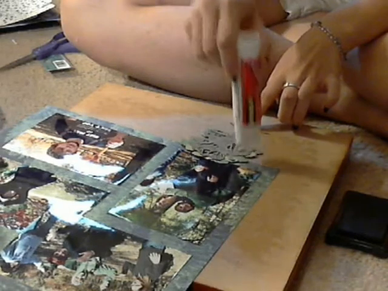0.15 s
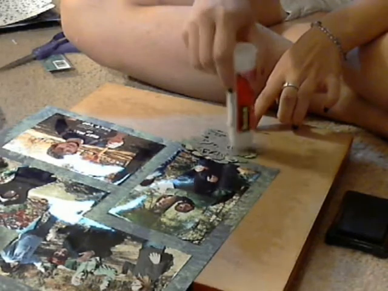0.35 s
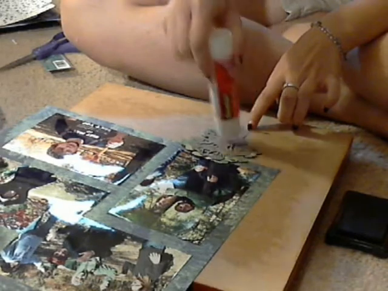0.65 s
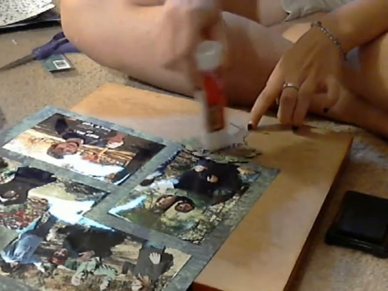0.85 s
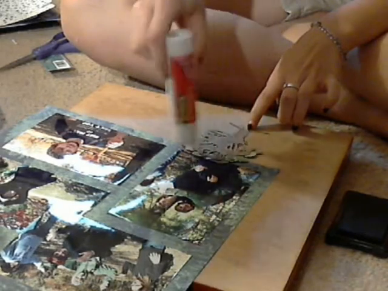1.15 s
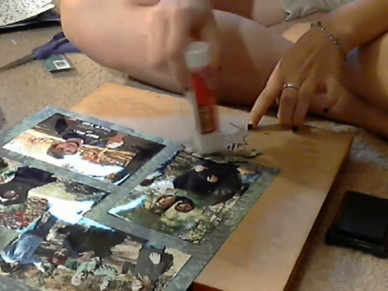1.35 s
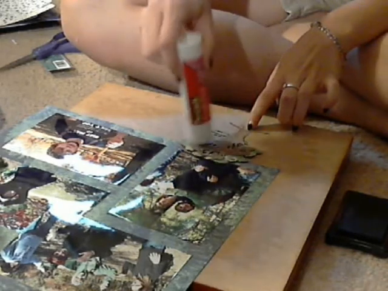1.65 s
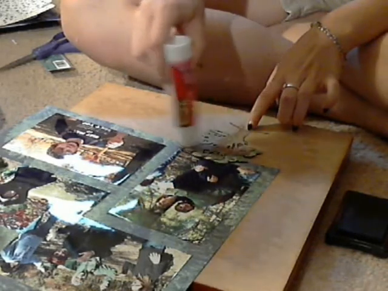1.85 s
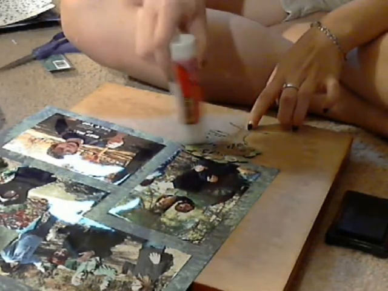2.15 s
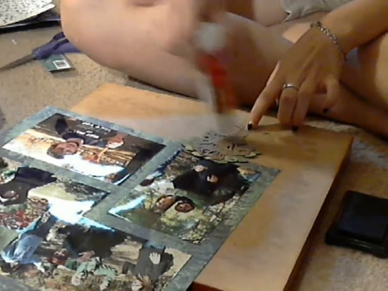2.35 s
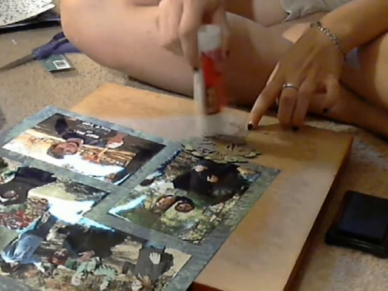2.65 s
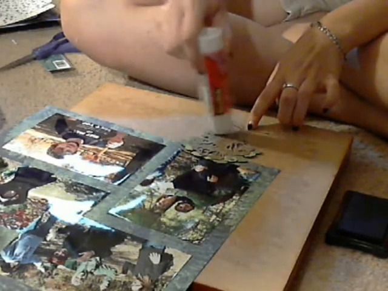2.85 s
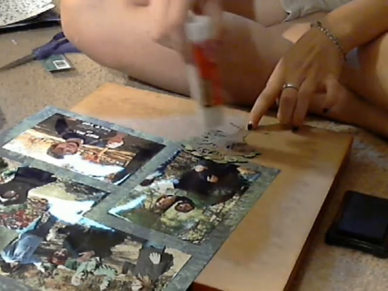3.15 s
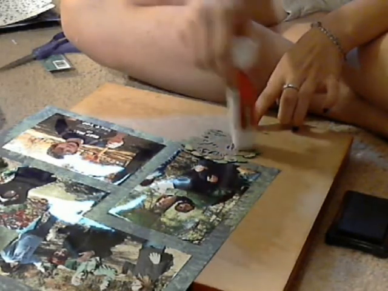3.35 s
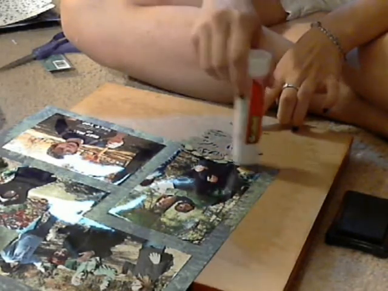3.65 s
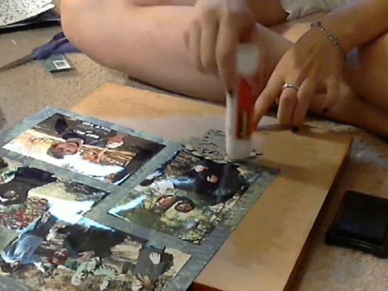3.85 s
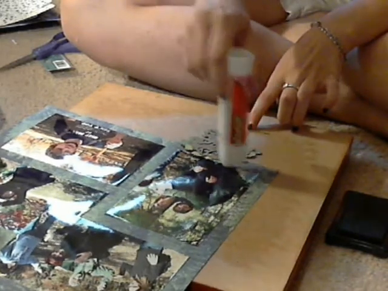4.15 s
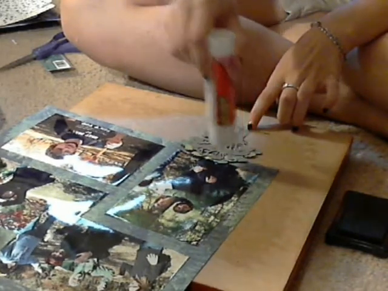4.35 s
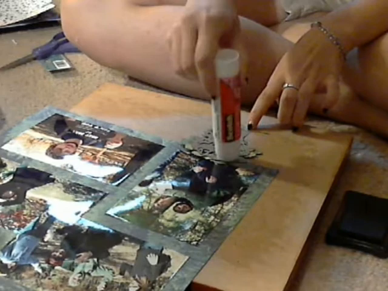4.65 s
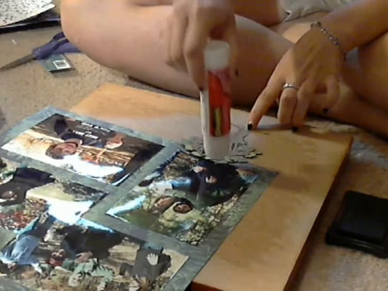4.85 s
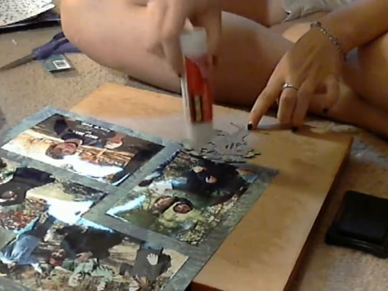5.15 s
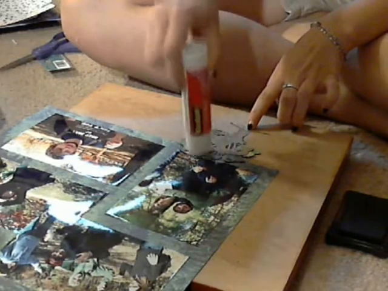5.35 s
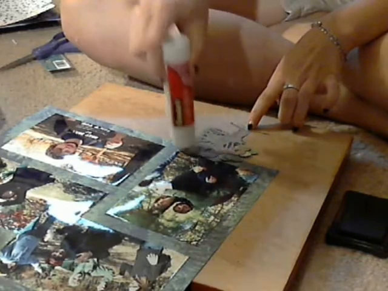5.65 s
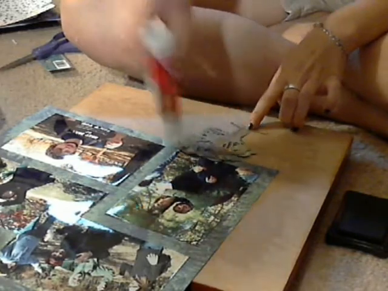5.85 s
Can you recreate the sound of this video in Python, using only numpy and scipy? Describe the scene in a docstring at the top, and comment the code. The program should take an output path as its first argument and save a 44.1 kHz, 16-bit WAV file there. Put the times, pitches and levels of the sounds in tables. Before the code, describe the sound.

A glue stick thumps and drags on paper over a wooden board, with dull rubs, tiny sticky snaps and a faint fan hum.

```python
"""Glue stick on a paper cutout

A glue stick is dabbed and dragged over paper on a wooden board, in a quiet, dead room.
Each push thumps the board through its resonances, with a brief bright tick. Tacky glue snaps in noise bursts.
The stick rubs dully and the paper scuffs: both are trains of tiny slips, filtered and swelled.
A fan hums faintly over a rush of air, and a small microphone adds hiss and weak treble images."""
import sys
import numpy as np
from scipy import signal
from scipy.fft import rfft, irfft, next_fast_len
from scipy.io import wavfile
from scipy.ndimage import map_coordinates

SR = 44100
rng = np.random.default_rng(int(sys.argv[2]) if len(sys.argv) > 2 else 0)


def store_pcm(level_fs):
    """Save levels as 16-bit WAV."""
    pcm = np.round(np.clip(level_fs, -1, 1) * 32767).astype(np.int16)
    wavfile.write(sys.argv[1], SR, np.atleast_2d(pcm).T)


N = 264582  # length of the scene in samples

# The stick lands on or presses the board, or the board springs back. Each row: start in seconds,
# relative push in dB, corner of the soft contact in Hz, skid level in dB, relative settling push in dB.
CONTACTS = [(0.365, 29.5, 48.4, -64, 9), (0.748, 17.5, 86, -58, 19.5), (1.7378, 16, 167, -69, 0),
            (2.1346, 13, 184, -68, 18.5), (2.364, 10, 65, -67, 0), (2.4635, 22.5, 123, -44.5, 22.5),
            (2.8149, 23.5, 118, -53, 22), (2.983, 7, 114, -62, 11), (3.388, -10.5, 387, -55.5, -2),
            (3.535, 3.5, 90, -74, 0), (3.951, -1.5, 225, -58.5, 16.5), (5.0217, 30, 54, -68, 3),
            (5.3647, 18.5, 245, -53.5, 28), (5.612, 11, 430, -53, 2), (5.797, 24, 258, -47, 28),
            (5.937, -23, 300, -48.5, 3)]
# How the board rings. Each row: frequency in Hz, width in Hz, relative level in dB.
BOARD_MODES = [(121.5, 100, 1), (249, 55.7, 16), (294, 57.3, 16.5), (316, 174, -0.5), (794, 180, -39),
               (87, 20.4, 1)]
# How stick and paper ring under friction. Each row: frequency in Hz, width in Hz, relative level in dB.
FRICTION_MODES = [(245.5, 20, -0.5), (367, 34, 6.5), (528, 66, 3.5), (907, 230, -0.5), (1362, 130, -2.5)]
# The tone colour of dry paper. Each row: frequency in Hz, relative level in dB.
PAPER_COLOUR = [(500, -17), (2500, 2), (4000, -0.5), (6400, 6), (7300, -2), (8200, -11), (11000, -35)]


def amp(db):
    """Turn decibels into a gain."""
    return 10 ** (np.asarray(db) / 20)


def unit(x):
    """Scale a sound to rms 1."""
    return x / np.sqrt(np.mean(x ** 2) + 1e-20)


def along(points, hz):
    """Read a curve of (Hz, value) points on a logarithmic frequency axis."""
    point_hz, values = np.transpose(points)
    return np.interp(np.log(hz + 1), np.log(point_hz + 1), values)


def wobble(rate):
    """Draw a smooth random curve with rate knots a second."""
    knots = rng.standard_normal(int(N * rate / SR) + 4)
    return map_coordinates(knots, [np.arange(N) * rate / SR])


def filtered(x, response):
    """Filter a sound by a complex response, given as a function of frequency."""
    size = next_fast_len(len(x) + SR // 4)  # spare room for ringing
    spectrum = rfft(x, size) * response(np.fft.rfftfreq(size, 1 / SR))
    return irfft(spectrum, size)[:len(x)]


def resonances(modes, f):
    """Add up ringing modes of (Hz, width in Hz, dB), with alternating signs."""
    total = 0
    for k, (centre, width, db) in enumerate(modes):
        mode = 1j * f * width / (centre * centre - f * f + 1j * f * width)
        total = total + (-1) ** k * amp(db) * mode
    return total


def add(track, s, sound):
    """Mix a sound into the track from time s in seconds."""
    start = round(s * SR)
    part = track[start:start + len(sound)]
    part += sound[:len(part)]


def slips(count, rate, spread_db):
    """Make tiny stick-slip impulses at random times, about rate a second, of uneven size."""
    happens = rng.random(count) < rate / SR
    sign = rng.choice([-1, 1], count)
    return happens * sign * amp(spread_db * rng.standard_normal(count))


def stroke(track, s, rise, fall, db, texture):
    """Lay a friction texture under a swell that peaks at time s."""
    lead = 1 / 10  # seconds before the peak
    t = np.arange(len(texture)) / SR - lead
    swell = np.exp(-np.where(t < 0, (t / rise) ** 2, np.abs(t / fall) ** 1.13))
    sound = texture * swell
    level = amp(db) * np.linalg.norm(swell) / (np.linalg.norm(sound) + 1e-12)
    add(track, s - lead, level * sound)


def hum_line(hz, db, wander_hz):
    """Make a sine tone whose pitch wanders a little."""
    phase = 2 * np.pi * np.cumsum(hz + wander_hz * wobble(20)) / SR
    return amp(db) * unit(np.sin(phase))


def fan():
    """A steady blade tone and weaker hum lines sound over an even rush of air."""
    # The rush of air. Each row: frequency in Hz, relative level in dB.
    air_colour = [(25, -22), (50, -14.5), (85, 3), (130, 1), (200, -3.5), (330, -4), (500, -8.5),
                  (800, -12.5), (1500, -16.5), (3000, -23.5), (8000, -36.5)]
    # The weaker hum lines. Each row: frequency in Hz, rms level in dB, pitch wander in Hz.
    hum_lines = [(86.6, -71, 3), (116.3, -81.5, 1.5), (628, -92, 3.2), (2630, -91, 18)]
    air = filtered(rng.standard_normal(N), lambda f: amp(along(air_colour, f)))
    blades = hum_line(382.2, db=-66.5, wander_hz=1 / 2)
    return amp(-67.0) * unit(air) + blades + sum(hum_line(*row) for row in hum_lines)


def fidgets():
    """The hand keeps nudging the board with faint, irregular creaks."""
    nudges = slips(N, rate=14, spread_db=5.0)
    creaks = slips(N, rate=60, spread_db=4.0) * amp(1.7 * wobble(5.9))
    low = filtered(nudges, lambda f: resonances(BOARD_MODES, f) / (1 + 1j * f / 70) ** 2)
    creaky = filtered(creaks, lambda f: resonances(FRICTION_MODES, f))
    return amp(-81.5) * unit(low) + amp(-82.0) * unit(creaky)


def slides():
    """Pushes skid; drags slide, bite and groan; grazes brush by: (s, rise s, fall s, dB, chatter Hz)."""
    # The stick is dragged under pressure. Each row: peak of the slide and start of the groan in seconds,
    # slide length in seconds, slide level in dB, chatter in Hz, groan length in seconds, groan level in dB.
    stick_drags = [(3.0, 0.039, -57, 870, 0.022, -79), (3.61, .028, -53, 810, .085, -55),
                   (4.116, .04, -72, 690, 0.069, -53.5), (4.655, 0.058, -49.5, 845, .13, -58.5),
                   (5.883, 0.016, -62, 1270, 0.0224, -48.5)]
    # The tip grazes the paper in passing. Each row: peak in seconds, level in dB, chatter in Hz.
    tip_grazes = [(.208, -67, 624), (.3, -69, 750), (.373, -52, 1200), (.753, -65, 1010), (1.21, -69, 1260),
                  (2.1, -63, 543), (2.372, -67, 483), (2.829, -66, 1120), (3.396, -64, 760),
                  (3.768, -60.5, 556), (4.153, -59, 540), (4.183, -59, 363), (5.217, -61, 516),
                  (5.945, -55, 1350)]
    rise_share = 0.4  # part of a slide spent speeding up
    bite_db, bite_s, bite_hz = -3.5, 0.0086, 577  # level against the slide, rise and fall time, chatter
    # the groan's pitch, then its peak, rise and fall as shares of its length
    groan_hz, groan_peak, groan_rise, groan_fall = 269.5, 0.45, 0.45, 0.5

    for s, _, _, skid_db, _ in CONTACTS:
        yield s + 0.00602, 0.0022, 0.017, skid_db, 528  # a short skid follows each push
    for s, length, db, chatter_hz, groan_s, groan_db in stick_drags:
        yield s, rise_share * length, (1 - rise_share) * length, db, chatter_hz
        # the wax bites at the height of the slide
        yield s, bite_s, bite_s, db + bite_db, bite_hz
        # the slowing stick groans
        yield s + groan_peak * groan_s, groan_rise * groan_s, groan_fall * groan_s, groan_db, groan_hz
    for s, db, chatter_hz in tip_grazes:
        yield s, 0.006, 0.015, db, chatter_hz


def rubs():
    """The waxy stick slips in small jerks and chatters; little sounds above the chatter."""
    out = np.zeros(N)
    for s, rise, fall, db, chatter_hz in slides():
        jerks = slips(SR // 3, rate=640, spread_db=2.5)
        chatter = [(chatter_hz, chatter_hz / 10, 3)]

        def colour(f):
            ringing = np.hypot(abs(resonances(FRICTION_MODES, f)), abs(resonances(chatter, f)))
            return ringing / np.hypot(1, (f / (0.97 * chatter_hz)) ** 5)

        stroke(out, s, rise, fall, db, filtered(jerks, colour))
    return out


def pushes():
    """A rebound and a settling push follow each push: (s, relative push dB, corner Hz) for each."""
    rebound_s, rebound_db, rebound_grows = 0.026, -31.5, 1.58  # delay, base level, dB per dB of push
    settle_s, settle_s_per_push, settle_hz = 0.0186, 0.0026, 54
    for s, db, corner_hz, _, settle_db in CONTACTS:
        yield s, db, corner_hz
        yield s + rebound_s, rebound_db + rebound_grows * db, corner_hz
        # the settling push comes later after a harder push
        yield s + settle_s + settle_s_per_push * amp(db), settle_db, settle_hz


def thumps():
    """Soft pushes ring the board; a firmer contact reaches its higher modes."""
    force, t = np.zeros(N), np.arange(SR // 20) / SR
    for s, db, corner_hz in pushes():
        u = 2 * np.pi * corner_hz * t
        push = u ** 2 * np.exp(-u)
        add(force, s, amp(db) * push / push.sum())

    def radiation(f, edge_hz=72):  # a small board radiates little bass
        return f * f / (f * f - edge_hz ** 2 - 1j * f * edge_hz)

    def echo(f):  # a near surface returns the thump 6.58 ms later
        return 1 + 0.44 * np.exp(-2j * np.pi * f * 0.00658)

    return amp(-2.0) * filtered(force, lambda f: resonances(BOARD_MODES, f) * radiation(f) * echo(f))


def contact_ticks():
    """Each push carries a brief bright tick over a dry scratch, stronger with the push."""
    # The tone of the tick. Each row: multiple of its main frequency, width in Hz, relative level in dB.
    tick_modes = [(.6, 393, -13), (1, 257, -8), (1.55, 895, -22)]
    tick_hz, tick_db = 3950, -89  # main frequency; level relative to the push
    out, t = np.zeros(N), np.arange(SR // 10) / SR
    fade = amp(-60 * t / .08)  # falls 60 dB in 0.08 s
    modes = [(multiple * tick_hz, width, level) for multiple, width, level in tick_modes]

    def scratch_colour(f):
        return amp(along(PAPER_COLOUR, f)) / np.hypot(1, f / 3000)

    for s, push_db, *_ in CONTACTS:
        tick = unit(filtered(rng.standard_normal(len(t)), lambda f: resonances(modes, f)))
        scratch = unit(filtered(rng.standard_normal(len(t)), scratch_colour))
        add(out, s, amp(push_db + tick_db) * fade * unit(tick + scratch))
    return out


def threads(count=3):
    """Each peel breaks a few glue threads in quick succession: (s, relative dB, lower edge Hz) for each."""
    # Tacky glue lets go. Each row: start in seconds, relative level of the first snap in dB,
    # change per thread in dB, lower edge in Hz.
    glue_peels = [(0.3675, -43, -6, 3000), (0.895, -52, 4, 7000), (5.018, -23.5, -11.5, 3280),
                  (5.3585, -30.5, 2, 5400), (5.6082, -40, -3, 5000)]
    gap_s = 0.0036
    for s, db, step_db, edge_hz in glue_peels:
        for k in range(count):
            yield s + k * gap_s, db + k * step_db, edge_hz


def glue_snaps():
    """Each snap is a sharp crack of noise along with a longer, but still short, flutter of the paper."""
    # The tone colour of tacky glue. Each row: frequency in Hz, relative level in dB.
    tack_colour = [(500, -35), (2000, -9), (3500, -7.5), (4900, 1), (6300, 1), (7200, -9.5), (8300, -20),
                   (11000, -32)]
    out, t = np.zeros(N), np.arange(SR // 12) / SR
    for s, db, edge_hz in threads():
        # each noise falls 60 dB in the seconds given
        crack = rng.standard_normal(len(t)) * amp(-60 * t / .004)
        flutter = rng.standard_normal(len(t)) * amp(-60 * t / 0.092)
        burst = crack / np.linalg.norm(crack) + amp(-7.0) * flutter / np.linalg.norm(flutter)
        thin = signal.butter(2, np.clip(edge_hz, 100, SR / 3), "highpass", fs=SR)
        add(out, s, amp(db + 10) * signal.lfilter(*thin, burst))
    return filtered(out, lambda f: amp(along(tack_colour, f)))


def scuffs():
    """Paper fibres catch on each other in a dense, bright crackle."""
    # Dry paper slides. Each row: peak in seconds, level in dB, lower edge in Hz, upper edge in Hz.
    paper_slides = [(0.374, -66, 2800, 6900), (0.898, -69, 3800, 10000), (4.138, -52, 1910, 10000),
                    (4.647, -66, 2600, 2380), (5.083, -66, 5900, 9000), (5.615, -71, 4460, 8960),
                    (5.649, -71, 5500, 9100), (5.938, -71.5, 2000, 5030)]
    out = np.zeros(N)
    for s, db, low_hz, high_hz in paper_slides:
        fibres = slips(SR // 3, rate=4500, spread_db=1.5)

        def colour(f):
            band = 1 / np.hypot(1, (low_hz / (f + 1)) ** 3 + (f / high_hz) ** 6)
            return amp(along(PAPER_COLOUR, f)) * band

        stroke(out, s, 0.012, 0.016, db, filtered(fibres, colour))
    return out


def room(x, count=13):
    """The room answers with a short tail of fading noise, made in overlapping stretches that crossfade."""
    # How long the room rings. Each row: frequency in Hz, time to fall 60 dB in seconds.
    decay_times = [(100, 0.43), (300, 0.061), (1000, 0.16), (6000, 0.055), (15000, 0.032)]
    out, hop = np.zeros(N), N // (count - 1)
    for centre in np.arange(count) * hop:
        span = np.arange(max(centre - hop, 0), min(centre + hop, N))
        hz, t, z = signal.stft(rng.standard_normal(SR // 3), SR, nperseg=256)
        fade = amp(-60 * t / along(decay_times, hz)[:, None])
        tail = signal.istft(z * fade, SR, nperseg=256)[1]
        part = x[span] * (1 - abs(span - centre) / hop)
        add(out, span[0] / SR + 0.013, signal.fftconvolve(part, tail / np.linalg.norm(tail)))
    return out


def scene():
    """Mix the handwork, the room's answer and the fan."""
    knocks = thumps()
    friction = rubs() + scuffs() + glue_snaps() + contact_ticks()
    answer = room(amp(-22.0) * knocks + amp(-26.5) * friction)
    return (knocks + friction + fidgets() + answer + fan())[None]


def record(dry):
    """The microphone hisses, sheds deep bass and is resampled crudely, with a faint buzz on each thump."""
    # The tone colour of the hiss. Each row: frequency in Hz, relative level in dB.
    hiss_colour = [(880, -23), (1500, -29), (2000, -4.5), (2550, -2.5), (3100, -6), (4100, -5), (5300, -3),
                   (6300, 0), (7000, -4.5), (7800, -12.5), (11000, -24), (15700, -26)]
    mic_rate, top_hz = 48000, 15780  # samples a second; nothing sounds from top_hz up
    hiss = amp(-80.0) * unit(filtered(rng.standard_normal(N), lambda f: amp(along(hiss_colour, f))))
    sound = signal.lfilter(*signal.butter(2, 46, "highpass", fs=SR), dry[0]) + hiss
    # samples are dropped rather than interpolated, so every sound leaves weak images in the treble
    picked = np.floor(np.arange(N) * mic_rate / SR) * SR / mic_rate
    resampled = map_coordinates(sound, [picked])
    return filtered(resampled, lambda f: 1.0 * (f < top_hz))[None]


dry = scene()
out = record(dry)
store_pcm(out)
```